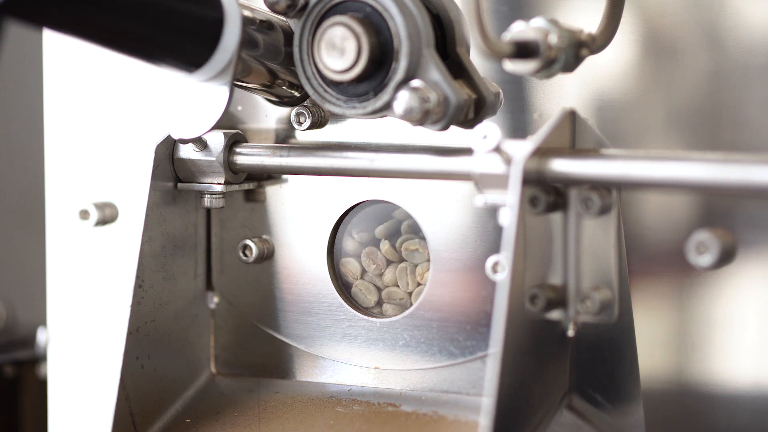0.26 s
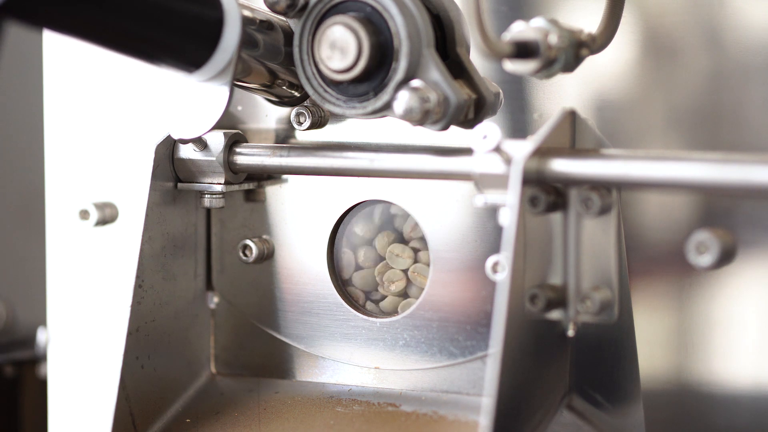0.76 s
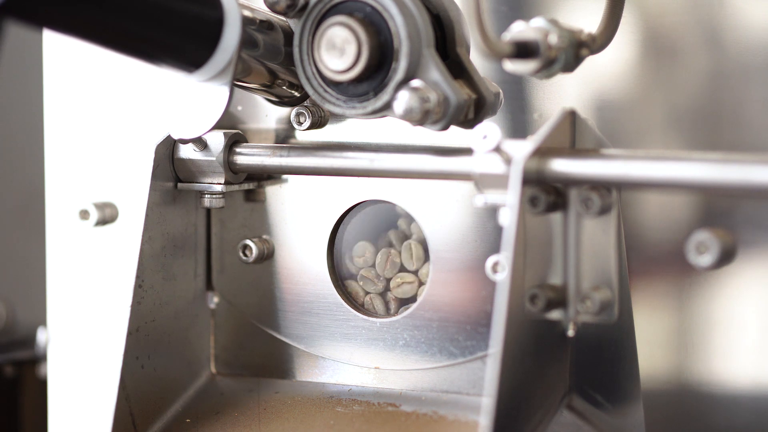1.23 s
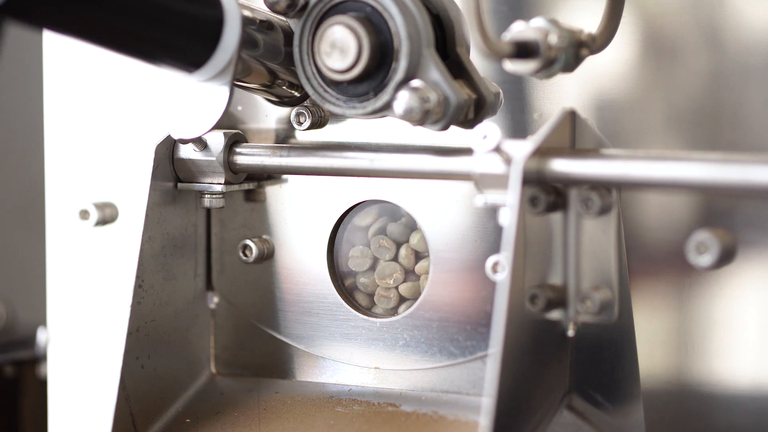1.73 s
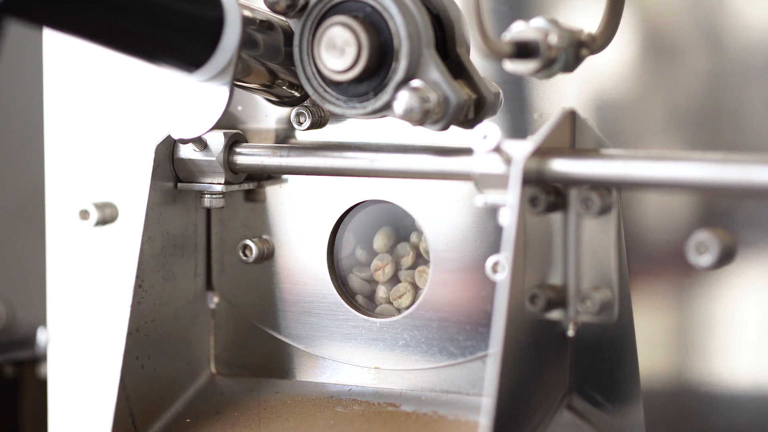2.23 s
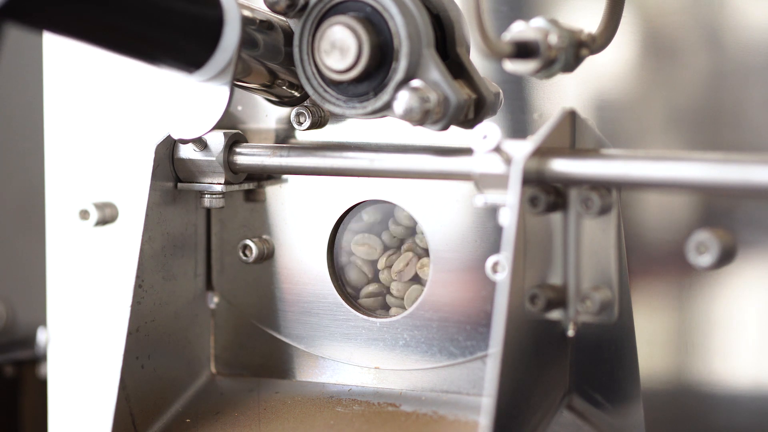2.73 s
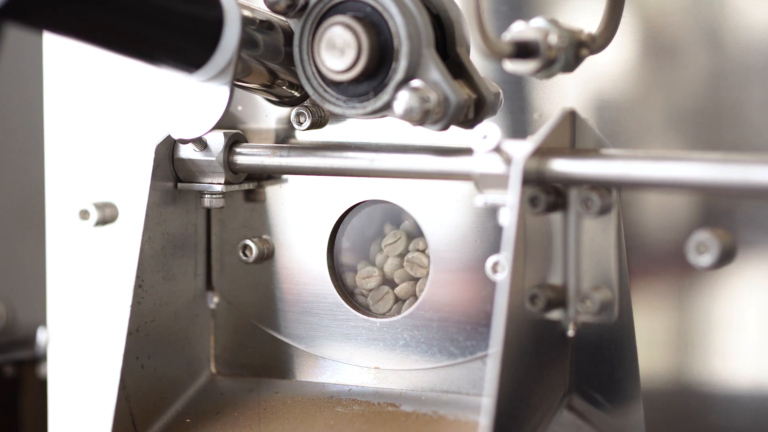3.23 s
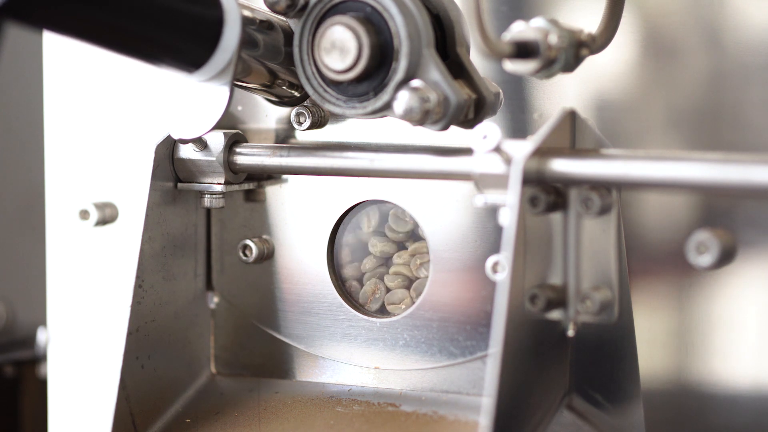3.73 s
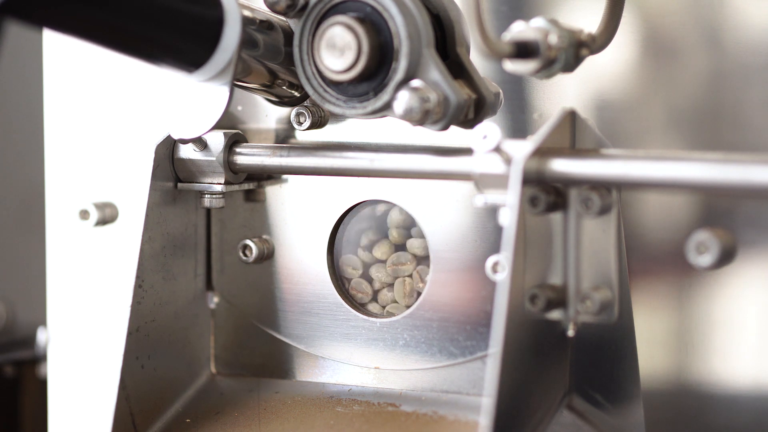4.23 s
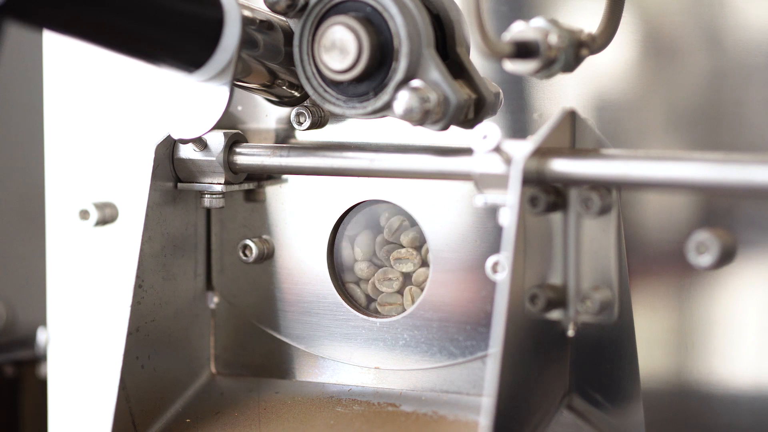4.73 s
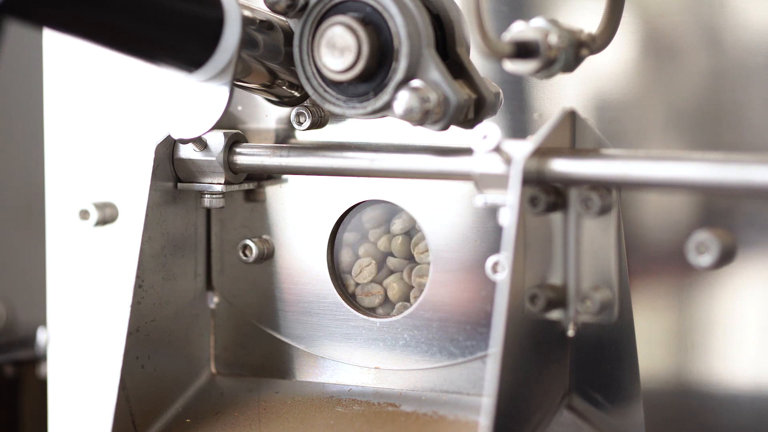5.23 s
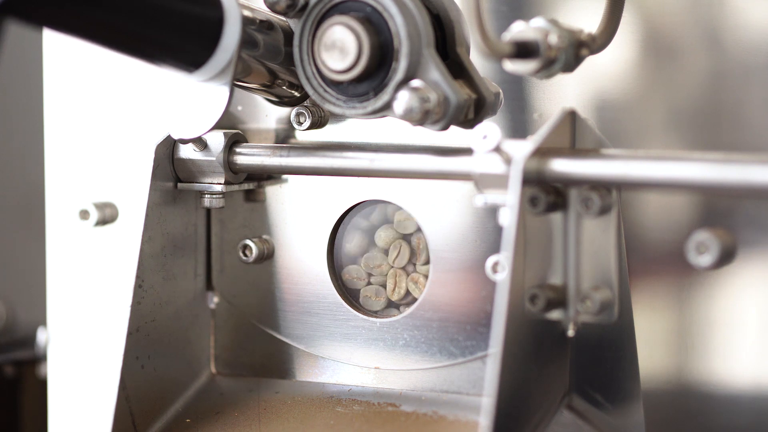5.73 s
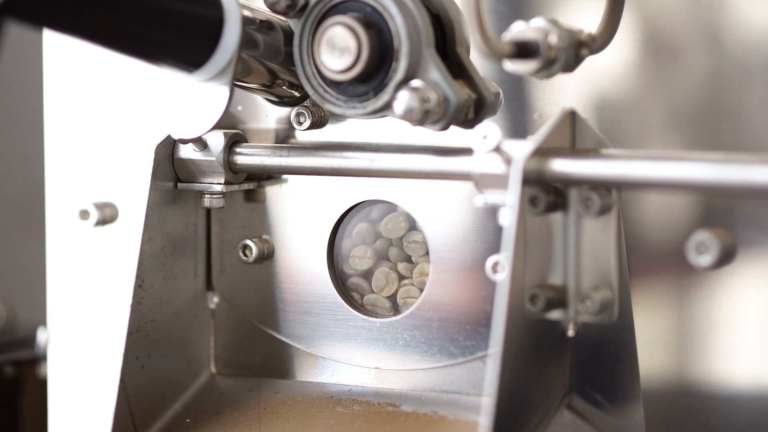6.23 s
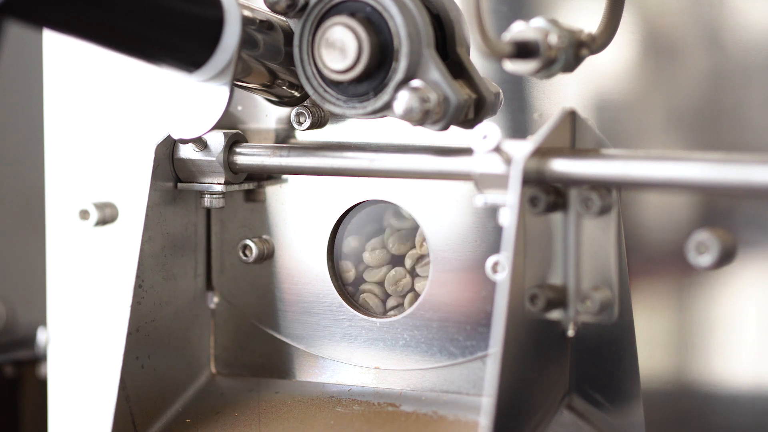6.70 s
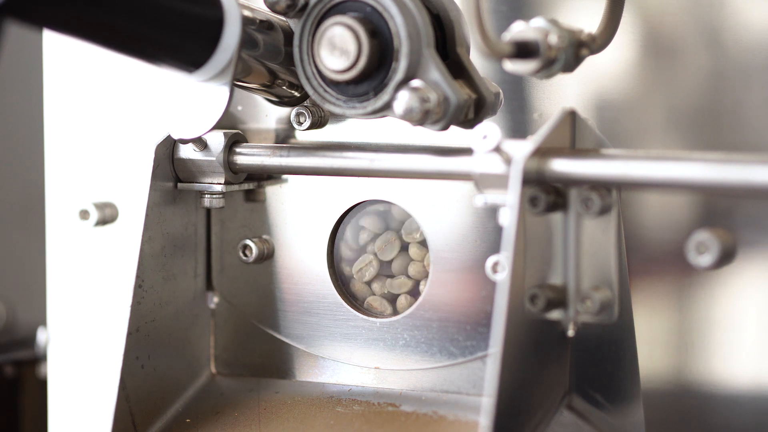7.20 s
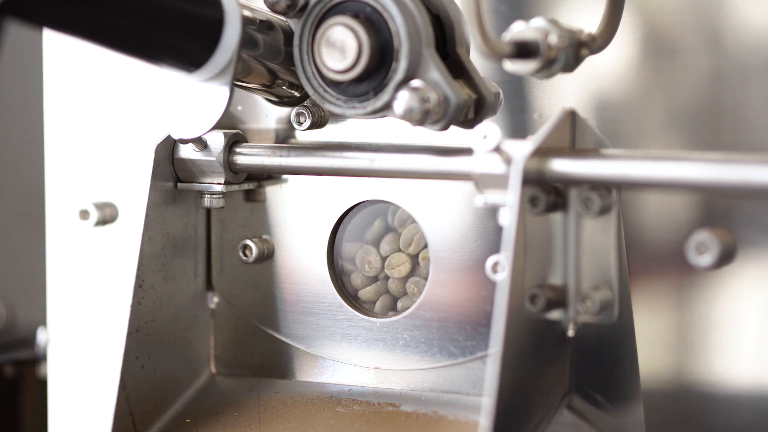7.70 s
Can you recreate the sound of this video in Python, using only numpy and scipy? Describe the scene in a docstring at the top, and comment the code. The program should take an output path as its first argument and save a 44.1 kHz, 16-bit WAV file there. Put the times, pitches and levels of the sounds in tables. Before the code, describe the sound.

From the first moment, coffee beans tumble inside a rotating steel roaster drum, heard close by in a room. Countless tiny impacts blend into a bright, hissing, metallic rattle, the loudest sound throughout. It rises and falls gently about three times a second as the beans are lifted and poured. Brief, high pings ring out of the steel at irregular moments, a little clearer around 0.7, 3, 5.4 and 7 seconds. Underneath, a quieter motor hums with a slight throb about once a second, and a fan adds a steady, low rush of air. A soft, slightly wavering mid-pitched tone swells and fades in the background, most noticeably right at the start and near 0.8, 6.3 and 7.9 seconds. The machine keeps the same pace and loudness to the end, at about 8 seconds.

```python
"""Coffee beans tumble in a steel roaster drum, heard close by in a room. From the start the motor hums,
the fan blows, and each vane lifts a heap and lets it pour, about three times a second; the dense hail
of impacts excites the many modes of the drum. Within the first tenth of a second a single mode rings
out and a soft tone near 500 Hz swells; such pings and swells come and go to the end, at eight seconds."""
import sys
import numpy as np
from scipy import signal
from scipy.fft import rfft, irfft, next_fast_len
from scipy.io import wavfile
from scipy.ndimage import uniform_filter1d

SR = 44100
rng = np.random.default_rng(int(sys.argv[2]) if len(sys.argv) > 2 else 0)


def generate_wav(signal):
    """Clip the signal to [-1, 1] and save it as 16-bit WAV at the path in sys.argv[1]."""
    frames = np.transpose(np.atleast_2d(signal))
    scaled = np.clip(frames, -1, 1) * 32767
    pcm = np.round(scaled).astype(np.int16)
    wavfile.write(sys.argv[1], SR, pcm)


N = 351036
FFT_SIZE = next_fast_len(N + SR // 4)
TURN_S = 1.0235  # one turn of the drum

# strongest modes of the drum: (frequency [Hz], relative peak level [dB])
DRUM_MODES = [(1443, -8.6), (1572, -8.2), (1863, -8.4), (2003, -7.6), (2272, -5.3), (2401, -4.3),
              (2573, -2.2), (2842, -5.8), (3445, -6.3), (4113, -4.7), (4328, 0.0), (4554, -3.9),
              (5017, -2.0), (5286, -2.9), (5394, -2.5), (5771, -0.5), (6008, -0.3), (6137, -1.8),
              (6277, -2.9), (6363, -2.5), (6557, -3.1), (6891, -5.2), (7106, -4.7), (7343, -4.2),
              (7580, -3.4), (7849, -5.4), (8107, -5.4), (8344, -5.0), (8667, -6.0), (9464, -6.0)]
# stereo width: (frequency [Hz], side level relative to mid [dB])
STEREO_WIDTH = [(60, -33), (110, -44), (200, -29), (380, -11.5), (700, -10.5), (1290, -8.5), (2380, -6),
                (4400, -3), (8120, -1), (15000, -1.5)]


def undb(db):
    """Decibels to amplitude ratio."""
    return 10 ** (np.asarray(db) / 20)


def level(x, db):
    """Scale to an rms level."""
    return x * undb(db) / np.sqrt(np.mean(x ** 2))


def colour(table, hz):
    """Interpolate (frequency [Hz], level [dB]) points on a log-frequency axis."""
    f, db = np.transpose(table)
    return np.interp(np.log(np.maximum(hz, 1)), np.log(np.maximum(f, 1)), db)


def walk(rate):
    """Slow random modulation: values held 1 / rate s and smoothed twice; spread near 1."""
    k = int(SR / rate)
    steps = np.repeat(rng.standard_normal(N // k + 1), k)
    return 1.31 * uniform_filter1d(uniform_filter1d(steps, k), k)[:N]


def cycle(table, place, period):
    """Periodic interpolation of a table's columns along its first."""
    at, *columns = np.transpose(table)
    return np.array([np.interp(place, at, c, period=period) for c in columns])


def bumps(times, lengths, heights, order=2):
    """A sum of Gaussian pulses; a higher order flattens their tops."""
    t = np.arange(0, N, 64) / SR
    shape = np.exp(-((t - times[:, None]) / lengths[:, None] * 2) ** order)
    return np.interp(np.arange(N) / SR, t, heights @ shape)


def motor(hum_hz=120.013):
    """Harmonics of twice the mains frequency, and gear tones; uneven load modulates their amplitude."""
    # steady upper harmonics: (harmonic number, level [dB])
    steady = [(4, -50.5), (5, -54), (6, -51.), (7, -55.5), (8, -63), (10, -60)]
    # two tones off the harmonic series: (frequency [Hz])
    gear_hz = (205.15, 849.75)
    # throb over one turn: (time [s], levels of harmonics 1, 2, 3 [dB], lower gear tone level [dB])
    throb = [(.08, -71.5, -51, -44.5, -76), (.22, -67.5, -50.5, -43, -64), (.32, -66.5, -50, -40.5, -59),
             (.42, -66, -55, -40, -60.5), (.56, -64.5, -55, -40.5, -57.5), (.72, -64, -63, -40, -74),
             (.86, -65.5, -66, -41, -76), (.97, -67.5, -62, -44, -76)]
    # brief dips of the third harmonic: (time [s], level change [dB], duration [s])
    dips = [(.04, -10, .12), (.265, -10, .05), (1.19, -5, .07), (2.02, -3, .08), (2.28, -14, .07),
            (3.14, -12, .1), (3.3, -2, .07), (4.06, -3, .1), (4.3, -14, .08), (5.06, -3, .08),
            (5.33, -7, .1), (6.24, -10, .1), (6.45, -7, .07), (7.09, -4, .1), (7.23, -7, .08),
            (7.4, -3, .15)]
    t = np.arange(N) / SR
    first_db, second_db, third_db, gear_db = cycle(throb, t, TURN_S)
    dip_s, depth_db, length_s = np.transpose(dips)
    third_db = third_db + bumps(dip_s, length_s, depth_db)
    harmonics = steady + [(3, third_db), (2, second_db), (1, first_db)]
    partials = [(k * hum_hz, db) for k, db in harmonics]
    partials += zip(gear_hz, (gear_db, -56))
    return np.sqrt(2) * sum(undb(db + 0.33 * walk(3.94)) * np.sin(2 * np.pi * (hz * t + rng.random()))
                            for hz, db in partials)


def fan(level_db=-40):
    """Broadband air noise filtered by the resonances of the housing; the bass is nearly mono."""
    # air noise: (frequency [Hz], relative spectral density [dB])
    spectrum = [(20, -39), (100, -30.5), (150, -19.5), (192, -22.5), (230, -8.5), (300, -7.5), (345, 1),
                (378, -11.5), (550, -6), (690, -11), (770, -5.5), (920, -9.5), (1300, -3), (1900, -17),
                (3000, -100)]
    # housing resonances and one notch: (frequency [Hz], bandwidth [Hz], gain [dB])
    housing = [(500, 42, 4.5), (842, 18, 7), (1028, 41, 4.5), (610, 22, 7), (328, 17, -8.5)]
    hz = np.arange(FFT_SIZE // 2 + 1) * SR / FFT_SIZE
    shape = undb(colour(spectrum, hz))
    for centre_hz, width_hz, db in housing:
        shape = shape * undb(db / (1 + (2 * (hz - centre_hz) / width_hz) ** 2))
    air = rfft(rng.standard_normal((2, FFT_SIZE))) * shape
    mid, side = irfft(air * [np.ones_like(hz), undb(colour(STEREO_WIDTH, hz))], FFT_SIZE)[:, :N]
    return level(np.array([mid + side, mid - side]), level_db) * undb(0.96 * walk(3.23))


def pouring(waver_db=0.32):
    """Amplitude envelopes [dB] of wall, shell and rustle: the flow of beans rises and falls at each vane."""
    # one pour, lull to lull: (phase [cycles], wall level [dB], shell level [dB], rustle level [dB])
    course = [(0, -24.5, -30.5, -25), (.15, -22.5, -29.5, -23.5), (.35, -22.2, -29, -23.5),
              (.52, -21.5, -27.5, -23), (.66, -22, -29, -21.5), (.78, -21.5, -30, -22),
              (.89, -23.5, -30.5, -24)]
    # three pours a turn: (time of the lull before [s], lull depth [factor], level offset [dB])
    pours = [(-0.19, 1.0, 0.0), (0.157, 0.99, 0), (0.523, 0.83, -0.2), (0.858, 1.05, -0.1),
             (1.172, 1.05, -0.2), (1.481, 0.59, 0), (1.861, 1.15, 0), (2.195, 0.98, -0.1),
             (2.521, 0.73, 0.3), (2.881, 1.4, 0.1), (3.177, 0.99, -1), (3.576, 0.72, 0.0),
             (3.879, 0.92, -0.2), (4.235, 1.26, -0.1), (4.565, 0.9, -0.6), (4.921, 1.16, -0.1),
             (5.273, 1.2, -0.2), (5.643, 0.61, -0.5), (5.943, 1, 0), (6.293, 1.1, 0.2), (6.624, 1.04, -0.0),
             (6.967, 1.4, 0), (7.3, 0.95, -0.5), (7.672, 1.11, 0.5), (8.0, 1.0, -3)]
    t = np.arange(N) / SR
    lull_s, depth, offset_db = np.transpose(pours)
    phase = np.interp(t, lull_s, np.arange(len(pours)))
    pour_db = cycle(course, phase, 1)
    top_db = pour_db.max(axis=1, keepdims=True)
    flow_db = top_db + np.interp(t, lull_s, depth) * (pour_db - top_db)
    flow_db += np.interp(t, lull_s + TURN_S / 6, offset_db)  # offsets apply mid-pour
    return uniform_filter1d(flow_db + waver_db * walk(10), SR // 30)


def bean_hail(flow_db, band_hz, hits_per_s, scatter_db, linewidth_hz, spots=12, spacing_hz=22.118):
    """Modal superposition: random impacts on each spot are convolved with that spot's impulse response."""
    # envelope of the drum's many lesser modes: (frequency [Hz], relative peak level [dB])
    lesser_peaks = [(530, -49), (900, -25.5), (1450, -7.5), (1990, -7), (2130, -8.5), (2550, 2),
                    (2980, -6.5), (3790, -9), (4230, -5.5), (4760, -7.5), (5910, -4.5), (6740, -8),
                    (7600, -5.5), (14200, -15), (15800, -18.5)]
    low_hz, high_hz = band_hz
    grid_hz = np.arange(low_hz, high_hz, spacing_hz)
    detune, unevenness = rng.standard_normal((len(grid_hz), 2)).T
    lesser_hz = grid_hz + 0.39 * spacing_hz * detune
    lesser_db = colour(lesser_peaks, lesser_hz) - 8 + 1.5 * unevenness
    strong_hz, strong_db = np.transpose([mode for mode in DRUM_MODES if low_hz <= mode[0] < high_hz])
    hz = np.r_[strong_hz, lesser_hz]
    gain = undb(np.r_[strong_db - 5, lesser_db])
    t = np.arange(SR // 12) / SR
    damped_modes = np.exp(np.outer(2j * np.pi * hz - np.pi * linewidth_hz, t))
    # a spot near a nodal line drives a mode weakly; all spots together drive it fully
    drive = rng.standard_normal((spots, 2, len(hz))) + 1j * rng.standard_normal((spots, 2, len(hz)))
    drive = drive * undb(8 * rng.standard_normal((spots, 1, len(hz))))
    drive = gain * drive / np.sqrt(np.mean(np.abs(drive) ** 2, axis=0))
    # the turning drum keeps offering other spots to the heap
    shares = undb(5.5 * np.array([walk(12) for _ in range(spots)]))
    shares = shares / np.sqrt(np.mean(shares ** 2, axis=0))
    flow = undb(flow_db)
    spectrum = 0
    for (mid, side), share in zip(drive, shares):
        side = side * undb(colour(STEREO_WIDTH, hz))
        response = (np.array([mid + side, mid - side]) @ damped_modes).imag
        sizes = undb(scatter_db * np.minimum(rng.exponential(size=N), 3.6))
        signs = np.sign(rng.standard_normal(N))
        struck = rng.random(N) < hits_per_s / spots / SR
        impacts = struck * sizes * signs * share * flow
        spectrum = spectrum + rfft(impacts, FFT_SIZE) * rfft(response, FFT_SIZE)
    # each band falls away below four fifths of its lower edge
    highpass = signal.butter(4, 0.8 * low_hz, "high", fs=SR, output="sos")
    hail = signal.sosfilt(highpass, irfft(spectrum, FFT_SIZE)[:, :N])
    return level(hail, 0) * np.sqrt(1.46 * np.mean(flow ** 2))


def pings(rise_s=0.034, fall_s=0.028, faint_count=200):
    """Resonant build-up: a run of beans strikes one place, and one mode swells and decays unevenly."""
    # modes that ring out of the hail: (time of peak [s], frequency [Hz], level [dB])
    clear = [(0.05, 4240, -29), (0.49, 5770, -37), (0.74, 5940, -26), (1.061, 2580, -33), (1.09, 6890, -30),
             (1.29, 4310, -30), (1.33, 2580, -33), (1.39, 8310, -32.0), (1.59, 4520, -29),
             (1.62, 7560, -30), (1.67, 2545, -32), (1.76, 6008, -32), (2.07, 4340, -33), (2.09, 5760, -28),
             (2.46, 6137, -31), (2.79, 8100, -27), (2.82, 4328, -36), (3.03, 5700, -24.5),
             (3.041, 2590, -27), (3.12, 6810, -34), (3.21, 5770, -32), (3.36, 7990, -30), (3.39, 5770, -31),
             (3.51, 4610, -30), (4.06, 5020, -29), (4.09, 2545, -34), (4.37, 4320, -28), (4.45, 6120, -30),
             (4.74, 2520, -33), (5.07, 5020, -31), (5.09, 6030, -28), (5.11, 2540, -34), (5.2, 4230, -28),
             (5.4, 4330, -26), (6.06, 6270, -29), (6.12, 5030, -30), (6.18, 6020, -30), (6.43, 4328, -33),
             (6.46, 2580, -31), (6.5, 6140, -28), (6.75, 7560, -31.0), (6.83, 6370, -30), (6.93, 6020, -28),
             (7.01, 4320, -24.5), (7.1, 4328, -32), (7.23, 4210, -27), (7.42, 4340, -28), (7.56, 5020, -30)]
    lead = SR // 10
    out = np.zeros((2, N + SR))
    t = np.arange(-lead, SR // 5) / SR
    swell = np.where(t < 0, np.exp(-(t / rise_s) ** 2), np.exp(-t / fall_s))
    # fainter ones come at any moment, on any of the strong modes
    when, which, weakness = rng.random((faint_count, 3)).T
    mode_hz, mode_db = np.array(DRUM_MODES)[(which * len(DRUM_MODES)).astype(int)].T
    faint = np.c_[when * N / SR, mode_hz, mode_db - 31 - 5 * weakness]
    events = np.r_[clear, faint]
    for (peak_s, hz, db), (offset, lag) in zip(events, rng.random((len(events), 2))):
        rough = undb(2 * np.interp(t, np.linspace(t[0], t[-1], 40), rng.standard_normal(40)))
        stereo_shift = np.array([[0], [0.15 * (lag - 0.5)]])
        phase = 2 * np.pi * (hz * t + offset + stereo_shift)
        at = int(peak_s * SR)
        out[:, at:at + len(t)] += np.sqrt(2) * undb(db) * swell * rough * np.sin(phase)
    return out[:, lead:lead + N]


def soft_tone(murmur_db=-51, waver_hz=2.955):
    """A sinusoid modulated in amplitude and frequency: it swells out of a murmur and wavers in pitch."""
    # swells of the tone: (time of peak [s], frequency [Hz], level [dB], duration [s])
    swells = [(.1, 508, -35, 0.18), (.76, 498, -37.5, 0.078), (.91, 497, -43, 0.055),
              (1.263, 497, -43, .06), (1.552, 490, -45, .06), (1.81, 492, -43, 0.054),
              (1.94, 498, -43, .08), (2.107, 510, -40, 0.054), (2.26, 502, -40, 0.12),
              (3.103, 503.5, -48, .08), (3.775, 498, -41, .05), (4.0, 494, -40.5, 0.054),
              (4.21, 510, -46, .14), (5.2, 510, -43, 0.074), (5.34, 498, -44, 0.052), (5.7, 495, -47, .05),
              (6.02, 501, -42, .07), (6.191, 507, -41, 0.11), (6.329, 512, -37, .13),
              (6.88, 497, -42, 0.053), (7.021, 501, -41.5, .12), (7.36, 505, -40, 0.062),
              (7.89, 499, -36.5, .1)]
    t = np.arange(N) / SR
    peak_s, hz, db, length_s = np.transpose(swells)
    swing_db = 2 * np.cos(2 * np.pi * (t - 0.046) / TURN_S)  # peaks once a turn
    murmur = undb(murmur_db + swing_db + 3.6 * walk(15))
    envelope = murmur + bumps(peak_s, length_s, undb(db), order=4)
    pitch_hz = np.interp(t, peak_s, hz) + waver_hz * walk(20)
    return np.sqrt(2) * envelope * np.sin(2 * np.pi * np.cumsum(pitch_hz) / SR)


def scene():
    """Linear superposition of three bands of bean impacts, pings, motor, tone and fan."""
    wall_db, shell_db, rustle_db = pouring()
    wall = bean_hail(wall_db, (3000, 7000), hits_per_s=7000, scatter_db=2.3, linewidth_hz=19)
    shell = bean_hail(shell_db, (900, 3000), hits_per_s=4000, scatter_db=2.95, linewidth_hz=12.6)
    rustle = bean_hail(rustle_db, (7000, 15900), hits_per_s=7400, scatter_db=1.75, linewidth_hz=22)
    return wall + shell + rustle + pings() + motor() + soft_tone() + fan()


def record(dry):
    """Band limiting: a steep elliptic low-pass cuts the highest treble."""
    return signal.sosfilt(signal.ellip(14, 0.3, 80, 15720, fs=SR, output="sos"), dry)


dry = scene()
out = record(dry)
generate_wav(out)
```